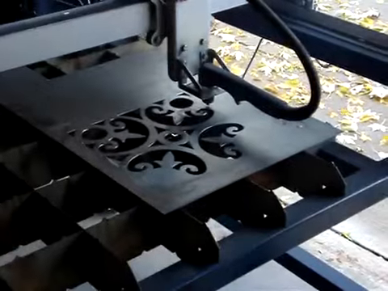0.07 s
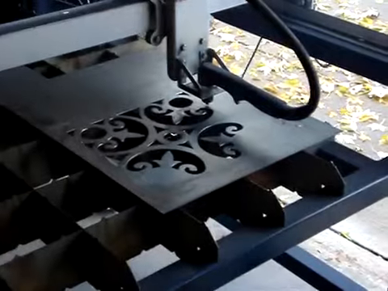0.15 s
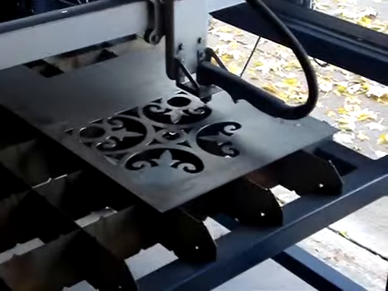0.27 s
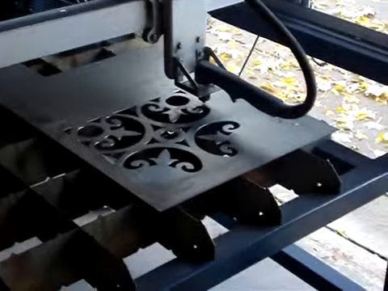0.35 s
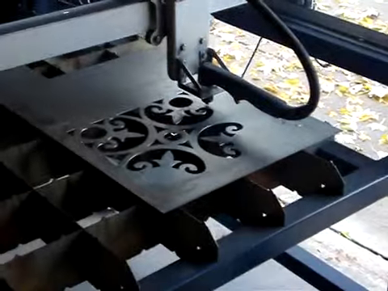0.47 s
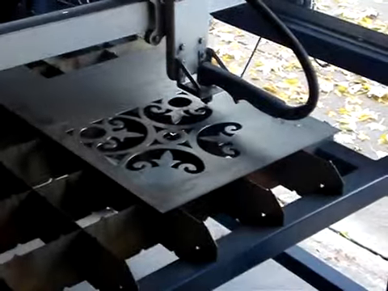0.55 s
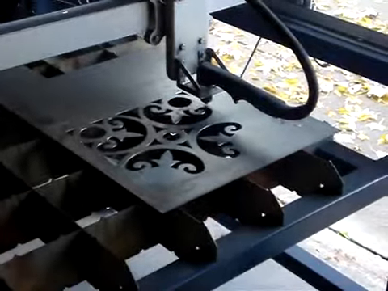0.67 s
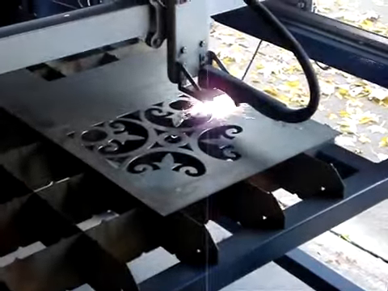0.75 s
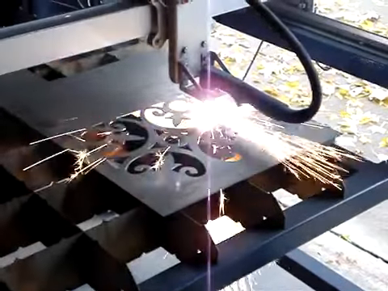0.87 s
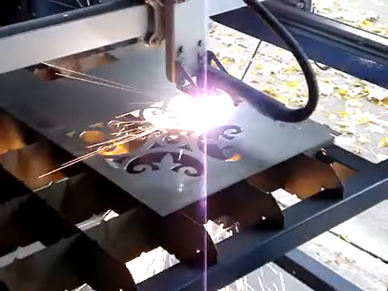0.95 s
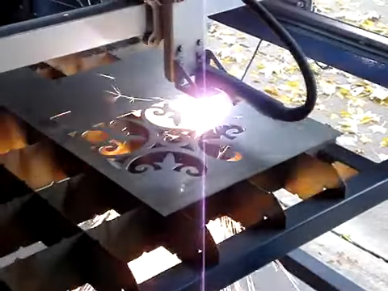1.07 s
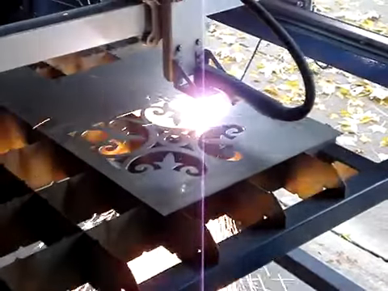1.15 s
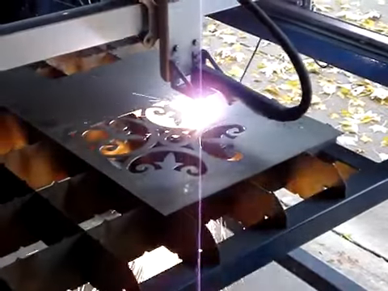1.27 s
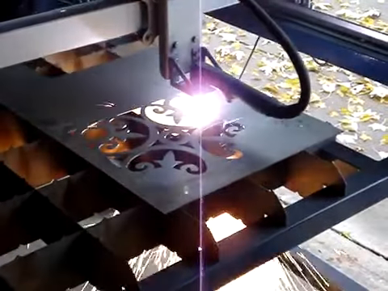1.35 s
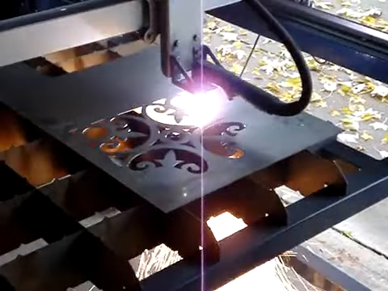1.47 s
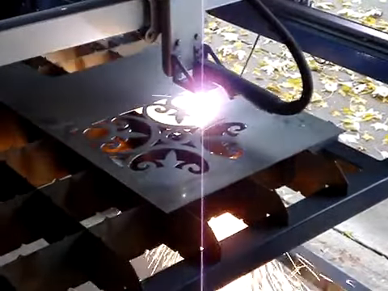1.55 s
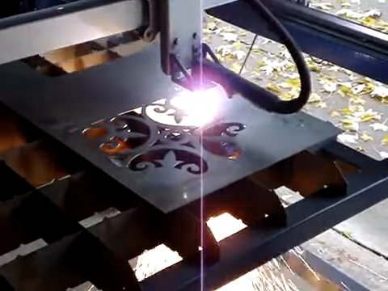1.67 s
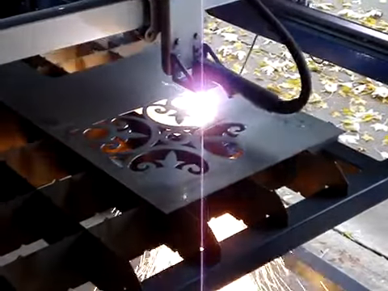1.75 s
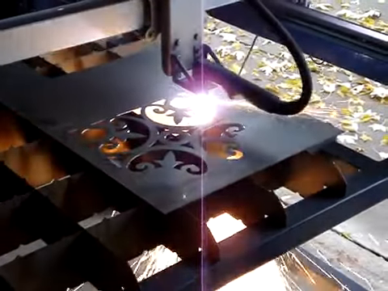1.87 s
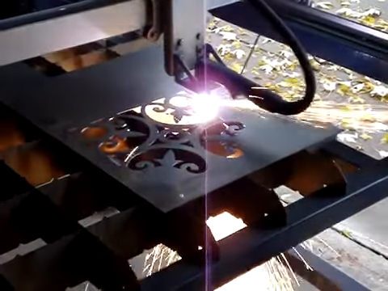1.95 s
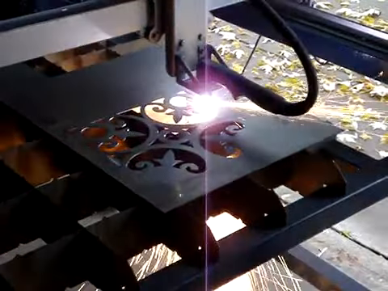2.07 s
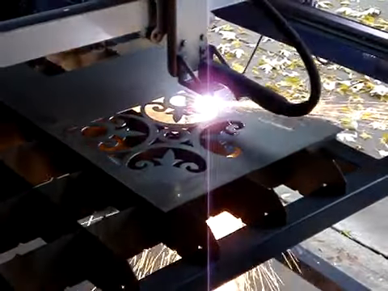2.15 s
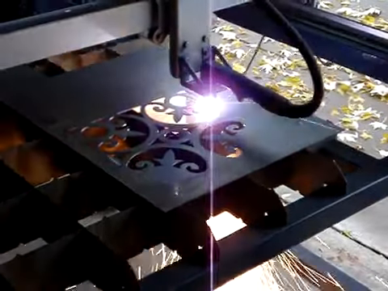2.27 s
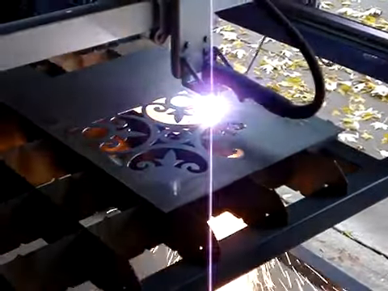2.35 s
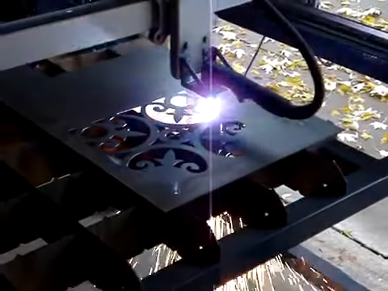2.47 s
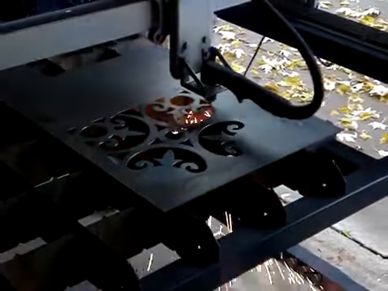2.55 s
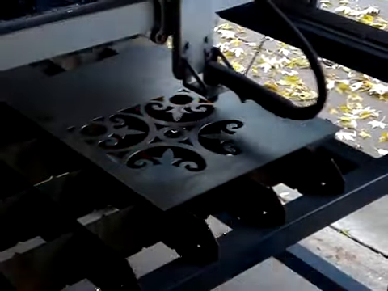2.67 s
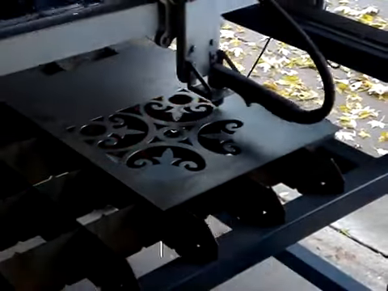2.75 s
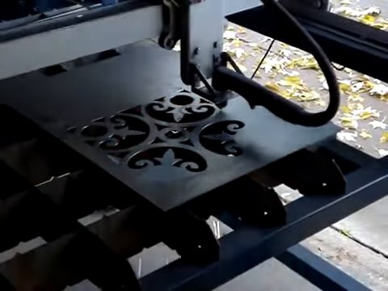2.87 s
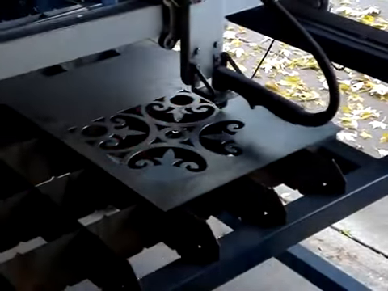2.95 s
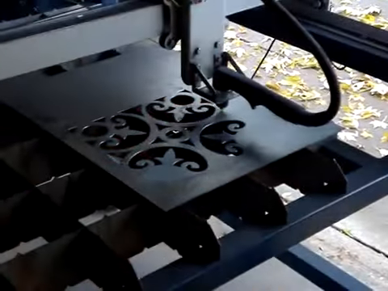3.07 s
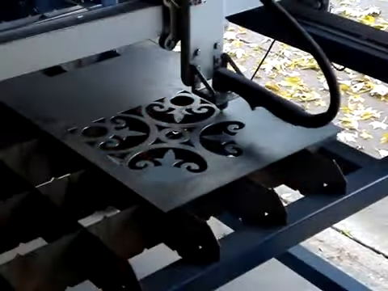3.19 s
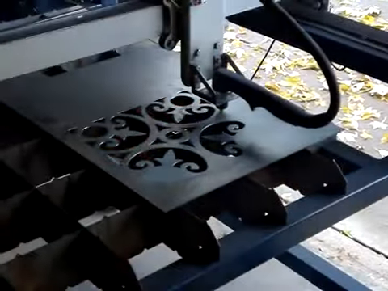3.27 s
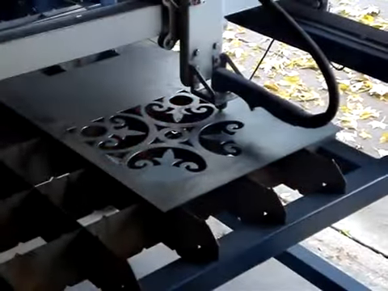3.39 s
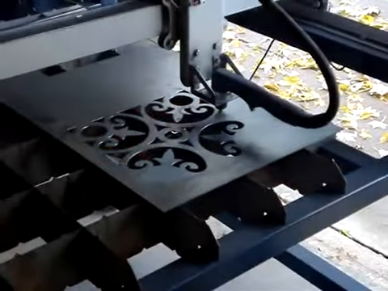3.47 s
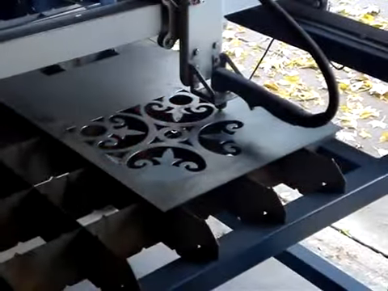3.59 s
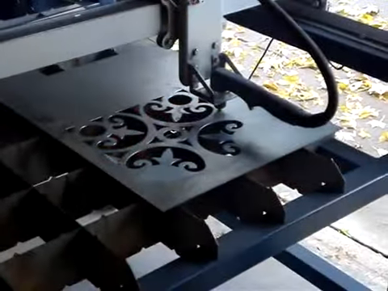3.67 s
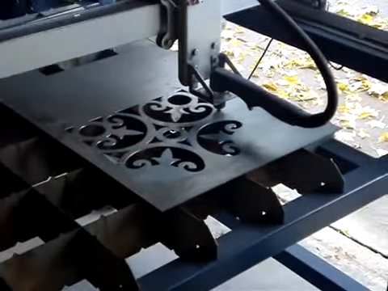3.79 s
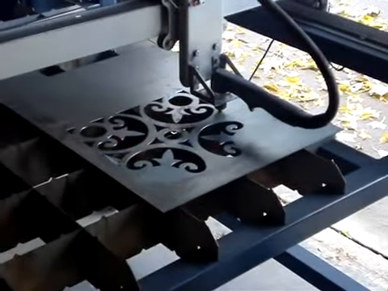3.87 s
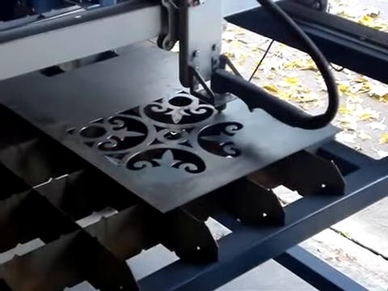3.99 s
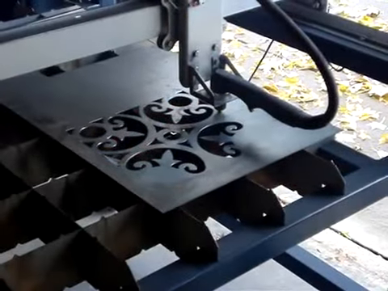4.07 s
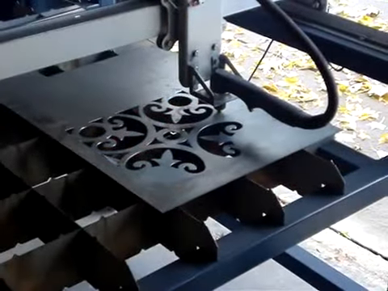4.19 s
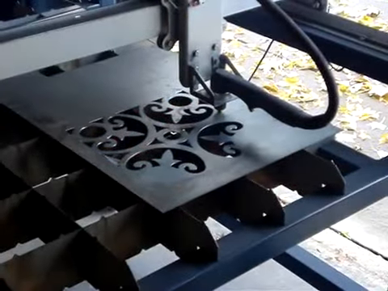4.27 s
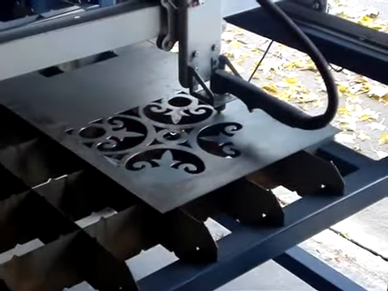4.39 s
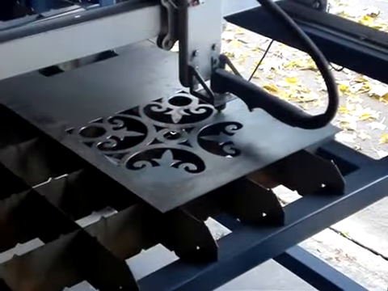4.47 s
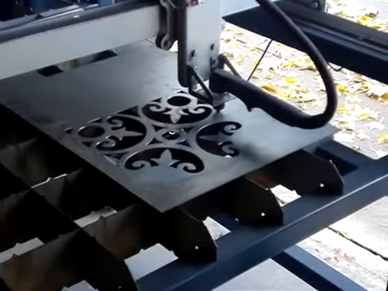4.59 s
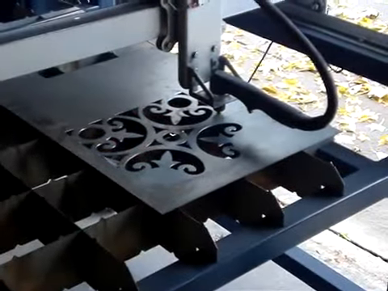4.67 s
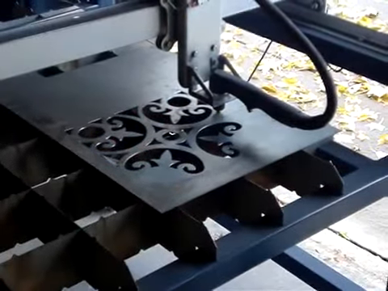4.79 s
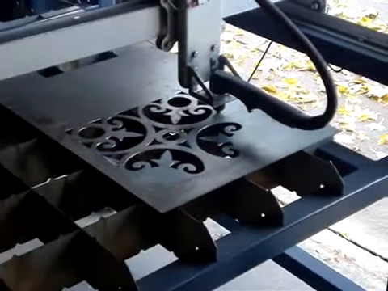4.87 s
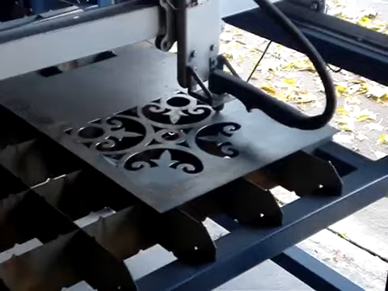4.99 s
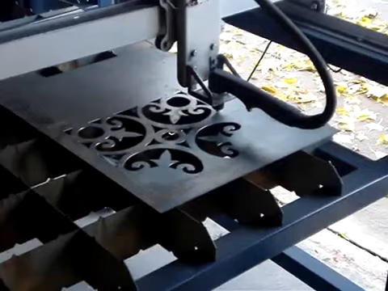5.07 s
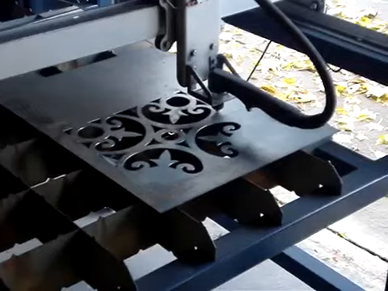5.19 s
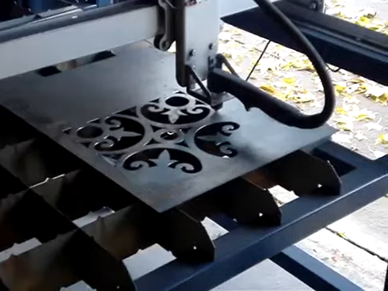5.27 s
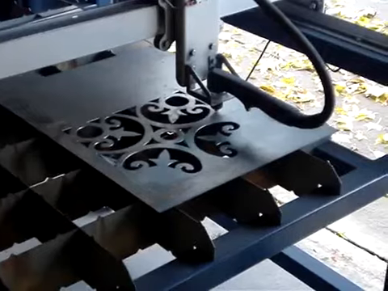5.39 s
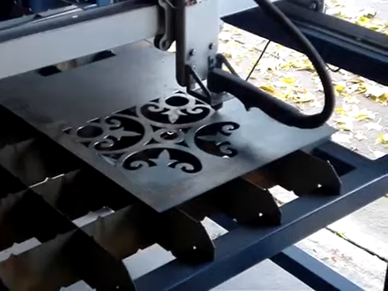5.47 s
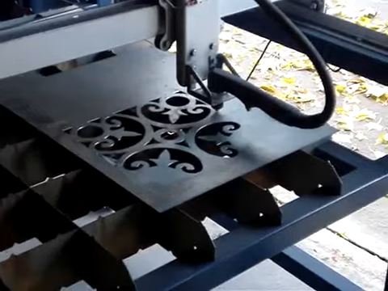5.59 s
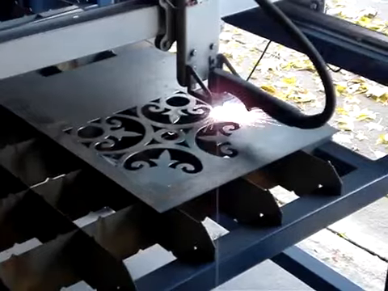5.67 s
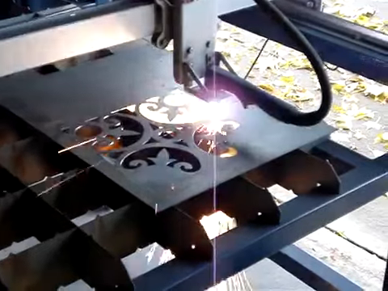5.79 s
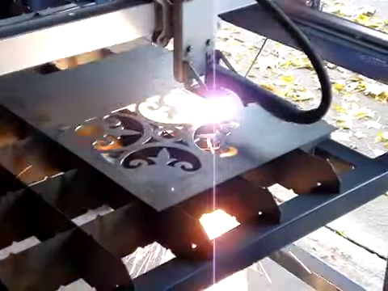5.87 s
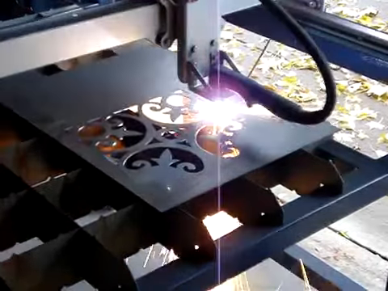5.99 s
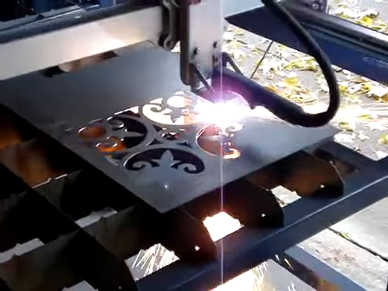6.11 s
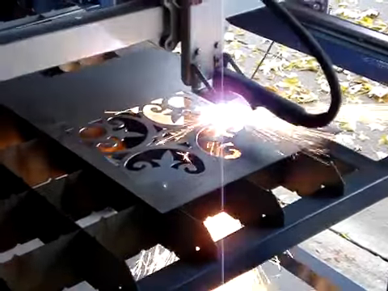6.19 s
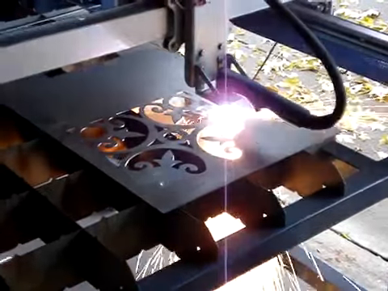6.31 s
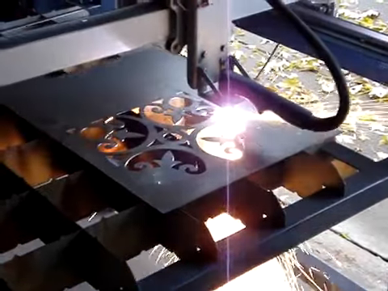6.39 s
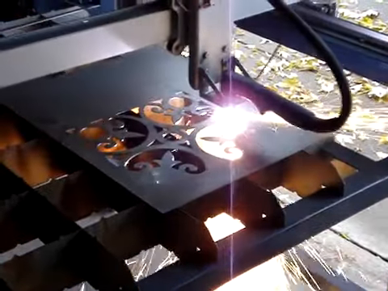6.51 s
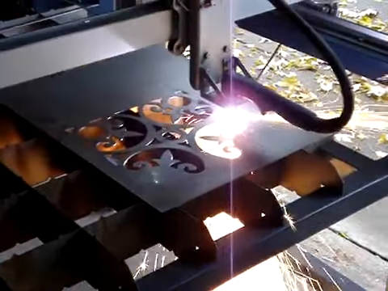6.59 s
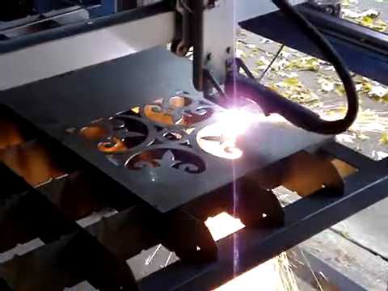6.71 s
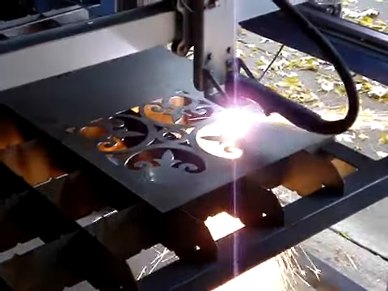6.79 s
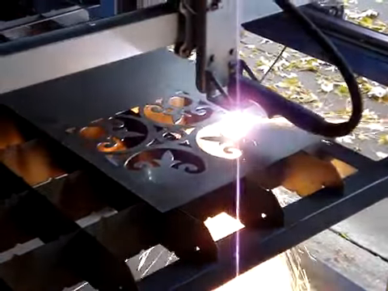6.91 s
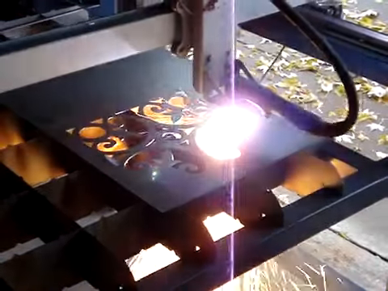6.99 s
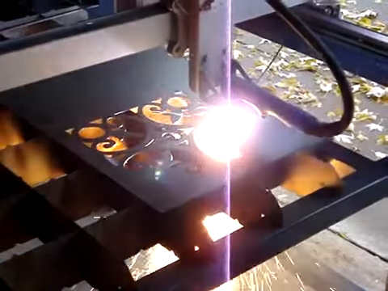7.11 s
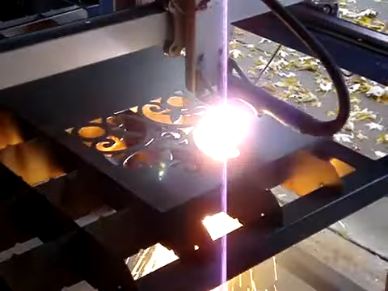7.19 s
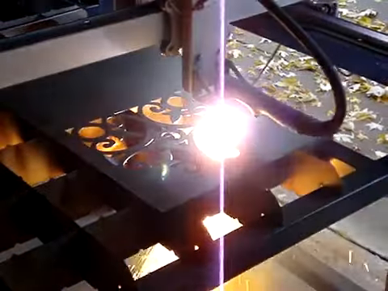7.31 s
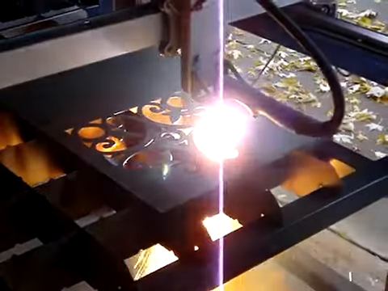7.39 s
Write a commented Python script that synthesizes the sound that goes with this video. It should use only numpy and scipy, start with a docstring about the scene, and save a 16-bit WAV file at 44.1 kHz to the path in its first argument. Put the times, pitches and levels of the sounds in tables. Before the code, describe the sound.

Hissing air and a compressor's hum outdoors, as a plasma torch makes two short, roaring, sputtering cuts through steel.

```python
"""Air hisses from a plasma torch beside a droning compressor, outdoors, heard through one microphone.
Twice the air bleeds away and bursts back as the arc strikes, then roars, spits and whistles through
steel plate. After the first cut a scrap clinks on the table's slats and the jet hisses on.
The camera's gain control rides the hiss: the drone swells while the air is off and each cut pushes it down.
A low microphone rumble lies underneath."""
import sys
import numpy as np
from scipy import signal
from scipy.fft import rfft, irfft
from scipy.io import wavfile
from scipy.ndimage import uniform_filter1d, minimum_filter1d

SR = 44100
rng = np.random.default_rng(int(sys.argv[2]) if len(sys.argv) > 2 else 0)


def transcribe(u):
    """Save the signal u as a 16-bit wav file named by the first command-line argument.

    u: samples, shape (n,) or (channels, n), limited to [-1, 1]; the rate is SR.
    q: integer samples, one column per channel.
    """
    v = np.clip(np.atleast_2d(u).T, -1, 1)
    q = np.round(v * 32767).astype(np.int16)
    wavfile.write(sys.argv[1], SR, q)


N = 328545
TIME = np.arange(N) / SR

# The two cuts: air_off_s, strike_s, arc_out_s, cutting_jet_db
CUTS = [(0.337, 0.894, 2.6, -26), (5.211, 5.802, 7.6, -26)]
# Air idling on to cool the torch: time_s, level_db
IDLE_AIR = [(0, -34), (3.8, -33.5), (4.5, -32), (5.25, -33.5)]
# Hiss at the nozzle: frequency_hz, relative_density_db
JET_SPECTRUM = [(150, -16.5), (500, -33.5), (1000, -18.5), (2000, -6.5), (3200, -6), (4600, -4.5),
                (5500, -2), (6500, -0.5), (7600, 0), (8700, -5), (9400, -14.5), (9900, -19)]
# Roar of the arc in the cut: frequency_hz, relative_density_db
ARC_SPECTRUM = [(120, -27), (350, -31), (600, -6), (1100, -6), (1600, -0.5), (2250, -1), (2900, -0.5),
                (3400, -3.5), (4200, -1), (6300, -1.5), (8000, -11), (9000, -13), (9900, -23)]
# How hard the arc bites into the steel: time_s, roar_db
ARC_BITE = [(1.0, -29.5), (2.6, -27), (5.9, -31), (6.25, -23), (6.65, -24.5), (7.2, -26), (7.45, -35)]
# Airy whistles and puffs in the slot: start_s, end_s, first_hz, last_hz, width_hz, level_db
SLOT_WHISTLES = [(1.0, 1.703, 3970, 4050, 90, -36.5), (1.42, 2.282, 2967, 2840, 380, -35),
                 (1.45, 2.45, 1470, 1500, 120, -39), (1.56, 2.086, 7750, 7700, 250, -49),
                 (1.98, 2.27, 4150, 4100, 160, -39), (2.4, 2.64, 5400, 5230, 1200, -28),
                 (2.59, 2.681, 1300, 1000, 700, -39), (6.08, 7.15, 1442, 1490, 100, -35),
                 (6.1, 6.944, 2825, 2750, 180, -34.5), (6.198, 6.9, 4410, 4100, 900, -36)]
# Modes of the steel scrap: pitch_hz, level_db, t60_s
SCRAP_MODES = [(5320, -25.5, 0.13), (8000, -31, 0.15)]
# The compressor's drone: shaft_multiple, relative_db
DRONE_HARMONICS = [(1, -34.5), (2, -20.5), (3, -20), (4, -10), (5, -14.5), (6, -23), (7, -6.5), (8, -17),
                   (9, -1), (10, -11), (11, -11), (12, -9.5), (13, -7.5), (14, -6.5), (15, 0.5), (16, -66),
                   (17, 2.5), (18, 4), (19, -6), (20, 1), (21, -18.5), (22, -2.5), (23, -12.5), (24, -35.5),
                   (25, -9), (26, -3.5), (27, -17), (28, -13.5), (29, -31), (30, -4), (31, -4.5), (32, -11),
                   (33, -0.5), (34, -8), (35, -13), (36, -15), (37, -16.5), (38, -30), (39, -27),
                   (40, -12.5), (41, -14), (42, -5), (43, -10), (44, -30), (45, -13), (46, -42),
                   (47, -16.5), (48, -14), (49, -9), (50, -8), (51, -24), (52, -21.5), (53, -24), (54, -43),
                   (55, -24.5), (56, -25), (57, -21), (58, -19), (59, -22), (60, -21), (61, -19.5),
                   (62, -20.5), (63, -16), (64, -22), (65, -16), (66, -16.5), (67, -17), (68, -19),
                   (69, -20), (70, -22.5), (71, -22), (72, -24.5), (73, -25), (74, -23.5), (75, -22.5),
                   (76, -13.5), (77, -19), (78, -18), (79, -9), (80, -20.5)]
# Trend of its higher, weaker harmonics: frequency_hz, relative_db
BUZZ_TREND = [(4700, -16), (5500, -31.5), (6200, -18), (7500, -37)]
# The exhaust puff and two valve knocks in each turn: position_turns, relative_db
PUMP_STROKES = [(0, -5), (0.407, -10.5), (0.764, -9.5)]
# The compressor's rushing air: frequency_hz, relative_density_db
RUSH_SPECTRUM = [(60, -37), (250, -12), (500, -14.5), (750, -9.5), (1050, -1), (1400, -3), (1900, -11),
                 (2200, -11), (2500, -3.5), (3400, -8), (4600, -5.5), (6200, -9.5), (8500, -13.5),
                 (9900, -29.5)]
# Rumble at the microphone: frequency_hz, relative_density_db
RUMBLE_SPECTRUM = [(10, -10), (22, -5), (60, -5), (130, -17), (400, -43), (2000, -85.5)]


def air_jet(flutter_db=0.5, buffet_db=0.7):
    """Compressed air hisses from the nozzle, less evenly while it blows into the cut."""
    unsteady_db = flutter_db * wander(14) + buffet_db * arc_burning() * wander(4)
    return airflow() * amplitude(unsteady_db) * turbulence(JET_SPECTRUM, patchy_db=1.5, ripple_db=2.5)


def airflow(bleed_db_per_s=42.5, burst_db=-17, open_s=0.04, pierce_s=0.21, pierce_db=-3, settle_s=0.04):
    """The jet idles, bleeds away, bursts as the valve opens, and blows hard until the arc goes out."""
    flow = level_curve(IDLE_AIR)
    for air_off, strike, arc_out, cutting_db in CUTS:
        shut = (TIME >= air_off) & (TIME < strike)
        flow *= amplitude(-bleed_db_per_s * (TIME - air_off) * shut)
        piercing = np.clip(1 - (TIME - strike) / pierce_s, 0, 1)  # flow builds as the plate is pierced
        blowing = gate(strike, open_s, arc_out - settle_s, settle_s)
        cutting = amplitude(cutting_db + pierce_db * piercing) * blowing
        burst = amplitude(burst_db) * gate(strike, open_s, end_s=strike + open_s + 0.021, fall_s=0.054)
        flow = np.maximum(flow, np.maximum(cutting, burst))
    return flow


def arc(spits_per_s=700, spit_db=-11, spread_db=2.5, flutter_db=1.64, surge_db=0.87):
    """The arc roars unevenly in the slot while drops of molten steel spit out."""
    drop_db = spread_db * np.minimum(rng.exponential(1, N), 4)
    drops = amplitude(drop_db) * rng.choice([-1, 1], N)
    spits = coloured(drops * (rng.random(N) < spits_per_s / SR), ARC_SPECTRUM)
    roar = turbulence(ARC_SPECTRUM, patchy_db=1.2, ripple_db=2.5)
    unsteady = amplitude(flutter_db * wander(22) + surge_db * wander(4))
    return level_curve(ARC_BITE) * arc_burning() * unsteady * (roar + amplitude(spit_db) * spits)


def arc_burning(rise_s=0.093, fall_s=0.14):
    """One while the arc burns, zero between cuts."""
    return sum(gate(strike, rise_s, arc_out, fall_s) for _, strike, arc_out, _ in CUTS)


def whistles():
    """Air sounds narrow resonances that glide as the slot grows or the nozzle's pressure falls."""
    out = np.zeros(N)
    # the nozzle's whistle sinks as the air bleeds away; columns as in SLOT_WHISTLES
    nozzle_whistles = [(air_off, air_off + 0.22, 5600, 4810, 1700, -35) for air_off, *_ in CUTS]
    for start_s, end_s, first_hz, last_hz, width_hz, level_db in SLOT_WHISTLES + nozzle_whistles:
        span = (TIME >= start_s) & (TIME < end_s)
        count = span.sum()
        pole = np.exp(-np.pi * 1.5 * width_hz / SR)
        noise = (rng.standard_normal(N) + 1j * rng.standard_normal(N))[span]
        band = signal.lfilter([1], np.poly([pole, pole]), noise)
        glide = np.exp(2j * np.pi * np.cumsum(np.linspace(first_hz, last_hz, count)) / SR)
        out[span] += amplitude(level_db) * unit_rms((band * glide).real) * signal.windows.tukey(count, 0.35)
    return out


def scrap_clink(start_s=2.731):
    """A scrap of steel hits the slats and rings in two modes."""
    age = np.maximum(TIME - start_s, 0)
    return sum(amplitude(db - 60 * age / t60) * np.sin(2 * np.pi * hz * age) for hz, db, t60 in SCRAP_MODES)


def compressor(shaft_hz=58.585, drone_db=-29, uneven_db=0.65, rush_db=-36.5, pulse_depth=0.083):
    """Beside the torch the pump drones at a nearly steady speed; its rushing air pulses in step."""
    speed_hz = shaft_hz * (1 + 0.000322 * wander(1.474) + 0.000555 * wander(25))
    turns = np.cumsum(speed_hz) / SR
    cycle = pump_cycle(shaft_hz)
    drone = unit_rms(np.interp(turns % 1, np.arange(len(cycle)) / len(cycle), cycle))
    pulsing = 1 + pulse_depth * np.cos(2 * np.pi * turns)
    rush = coloured(rng.standard_normal(N) * pulsing, RUSH_SPECTRUM)
    return amplitude(drone_db - uneven_db * wander(30)) * drone + amplitude(rush_db) * rush


def pump_cycle(shaft_hz, sweep_s=0.0038, pipe_hz=1100, scatter=0.22):
    """One turn of the shaft: three strokes ring the pump and its pipe."""
    multiples = np.arange(1, 129)
    hz = multiples * shaft_hz
    real, imag, spread = rng.standard_normal((3, len(hz)))
    harmonic_db = spectrum_db(BUZZ_TREND, hz) + 3 * spread
    harmonic_db[:len(DRONE_HARMONICS)] = np.transpose(DRONE_HARMONICS)[1]
    # lower tones leave the pump later, so each stroke chirps downwards
    lag = np.cumsum(sweep_s * np.log(pipe_hz / hz)) * shaft_hz
    strokes = sum(amplitude(db) * np.exp(-2j * np.pi * (multiples * at + lag)) for at, db in PUMP_STROKES)
    # echoes scatter the timing, least at the pipe's own ring
    echoes = scatter * (1 + 7 * np.log(hz / pipe_hz) ** 2) * (real + 1j * imag)
    harmonics = amplitude(harmonic_db) * np.exp(1j * np.angle(strokes + echoes))
    return irfft(np.r_[0, harmonics], 8192)


def microphone_rumble(level_db=-67.5):
    """The microphone's faint, low rumble."""
    return amplitude(level_db) * coloured(rng.standard_normal(N), RUMBLE_SPECTRUM)


def turbulence(spectrum, patchy_db, ripple_db):
    """Gas noise with drifting patches, and a fine steady ripple from echoes off the table's steel."""
    frames, hz = N // 256 + 5, np.fft.rfftfreq(1024, 1 / SR)
    real, imag, patches = rng.standard_normal((3, frames, len(hz)))
    patches = unit_rms(uniform_filter1d(uniform_filter1d(patches, size=20, axis=0), size=7, axis=1))
    ripple = unit_rms(uniform_filter1d(rng.standard_normal(len(hz)), size=3))
    colour_db = spectrum_db(spectrum, hz) + patchy_db * patches + ripple_db * ripple
    bins = (real + 1j * imag) * amplitude(colour_db)
    return unit_rms(signal.istft(bins.T, nperseg=1024, noverlap=768)[1][:N])


def amplitude(db):
    """Decibels to amplitude."""
    return 10 ** (np.asarray(db) / 20)


def unit_rms(x):
    """Scales to an rms of one."""
    return x / np.sqrt(np.mean(x ** 2) + 1e-20)


def spectrum_db(spectrum, hz):
    """Reads a spectrum table on a log-frequency axis."""
    knots_hz, knots_db = np.transpose(spectrum)
    return np.interp(np.log(hz + 1), np.log(knots_hz + 1), knots_db)


def level_curve(points):
    """A dB curve as an amplitude for every sample."""
    return amplitude(np.interp(TIME, *np.transpose(points)))


def coloured(x, spectrum):
    """Filters x by a spectrum table, to an rms of one."""
    response = amplitude(spectrum_db(spectrum, np.fft.rfftfreq(N, 1 / SR)))
    return unit_rms(irfft(rfft(x) * response, N))


def wander(hz):
    """Random drift up to about hz, at an rms of one."""
    knots = rng.standard_normal(int(N / SR * 2 * hz) + 2)
    return unit_rms(np.interp(TIME * 2 * hz, np.arange(len(knots)), knots))


def gate(start_s, rise_s, end_s, fall_s):
    """Rises from start_s, holds until end_s, then falls to nothing."""
    return np.clip((TIME - start_s) / rise_s, 0, 1) * np.clip(1 - (TIME - end_s) / fall_s, 0, 1)


def scene():
    """Compressor, torch and scrap as they reach one microphone in the open air."""
    return (compressor() + air_jet() + arc() + whistles() + scrap_clink())[None]


def gain_control(x, sense_hz=7200, target_db=-37.5, recovery_db_per_s=23, margin_db=1.5):
    """Gain in dB, steered by the treble: it lets go at once after a burst, slowly after lasting hiss."""
    treble = signal.sosfilt(signal.butter(8, sense_hz, "high", fs=SR, output="sos"), x)
    power = uniform_filter1d(treble ** 2, size=500)
    now_db = uniform_filter1d(10 * np.log10(abs(power) + 1e-12), size=500)
    lasting_db = minimum_filter1d(now_db, size=5001, origin=2500)  # lowest of the last 0.11 s
    recovery_db = recovery_db_per_s * TIME
    held_db = np.maximum.accumulate(lasting_db + recovery_db) - recovery_db + margin_db
    return target_db - np.maximum(now_db, held_db)


def record(dry, leak_db=-59.0, coupling_hz=4.5, top_hz=9950):
    """At the camera: gain control, whose voltage leaks in as a soft thump, rumble, then a band limit."""
    gain_db = gain_control(dry[0])
    thump = signal.lfilter(*signal.butter(1, coupling_hz, "high", fs=SR), gain_db - gain_db[0])
    mix = dry * amplitude(gain_db) + amplitude(leak_db) * thump + microphone_rumble()
    lowpass = signal.firwin(701, top_hz, window=("kaiser", 9), fs=SR)
    return signal.oaconvolve(mix, lowpass[None], "same")


dry = scene()
out = record(dry)
transcribe(out)
```